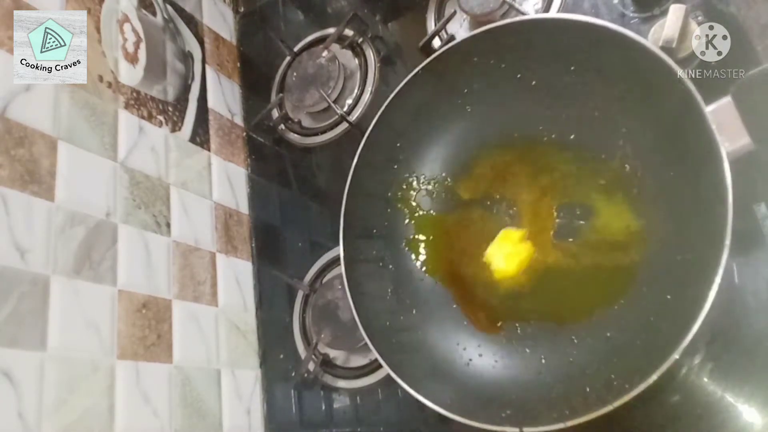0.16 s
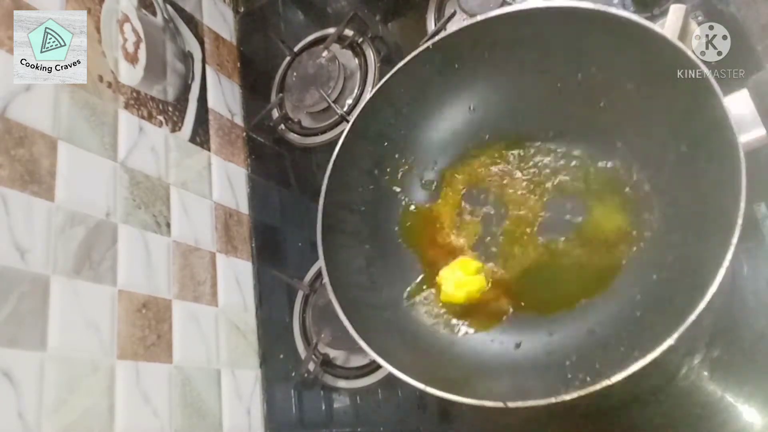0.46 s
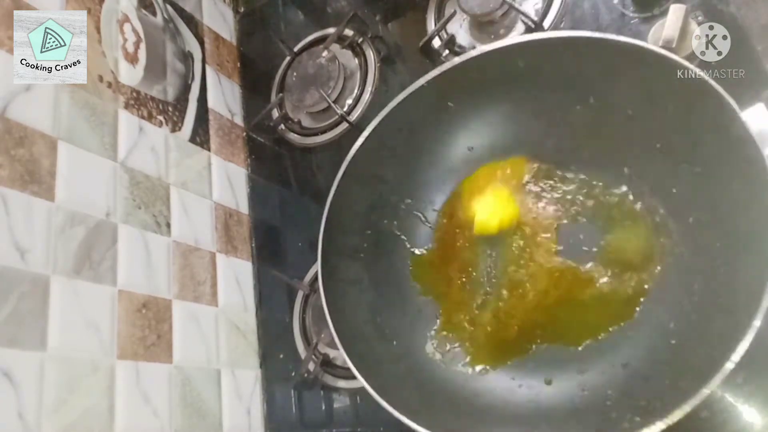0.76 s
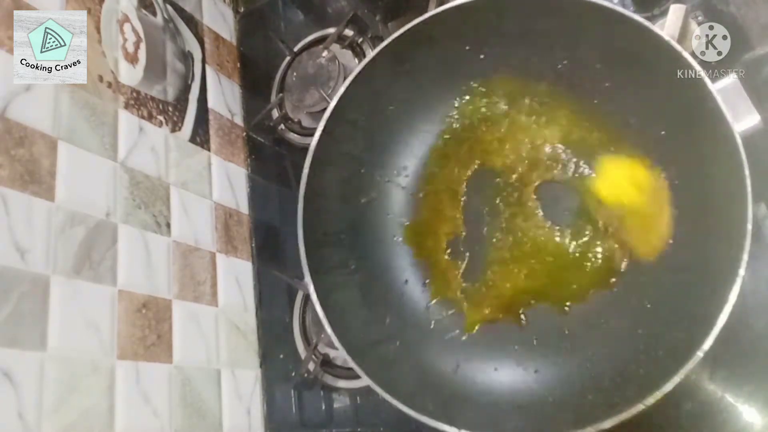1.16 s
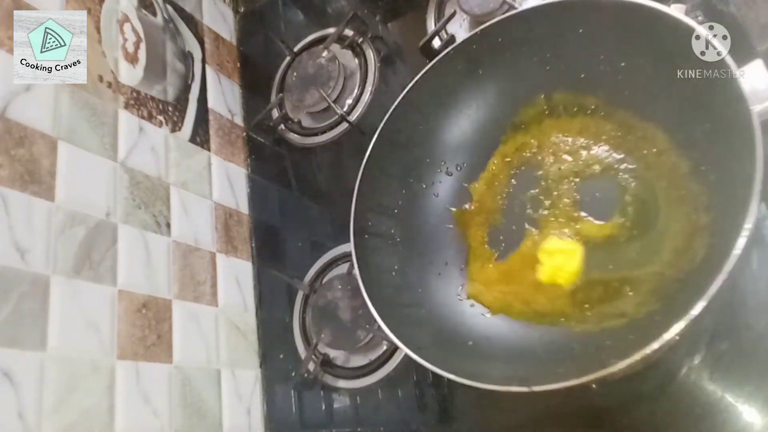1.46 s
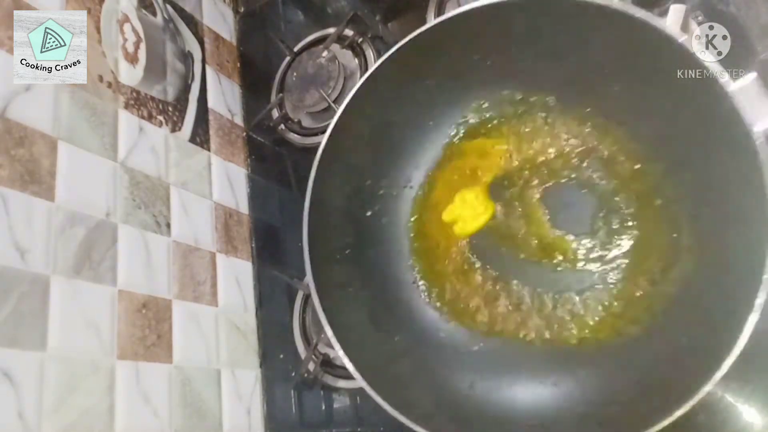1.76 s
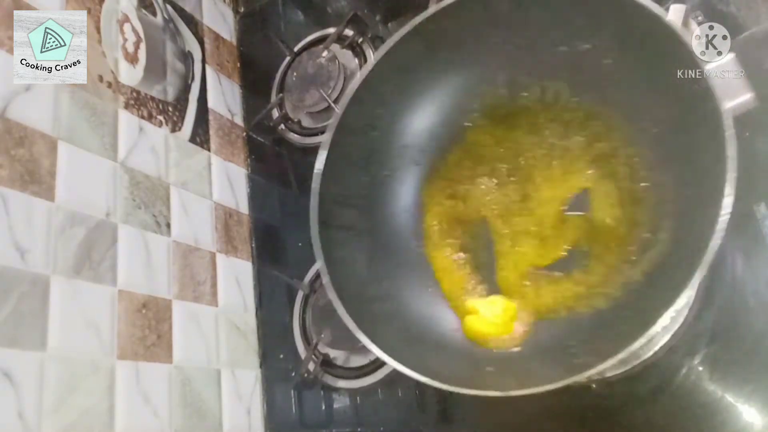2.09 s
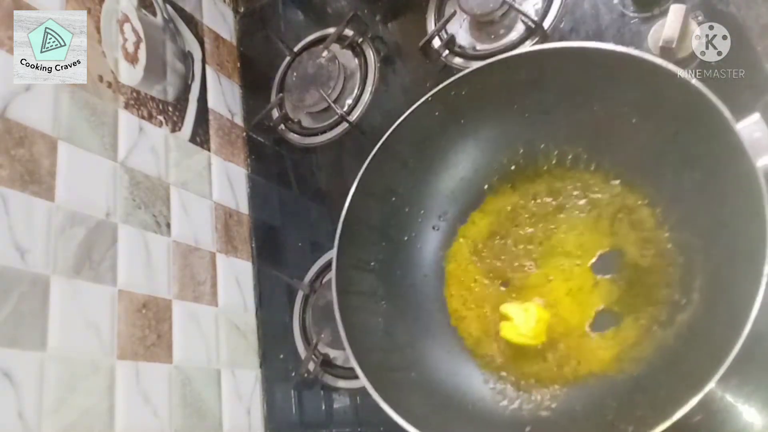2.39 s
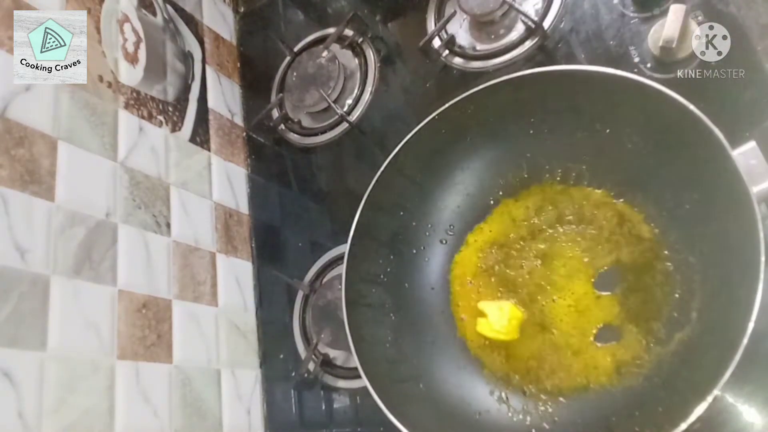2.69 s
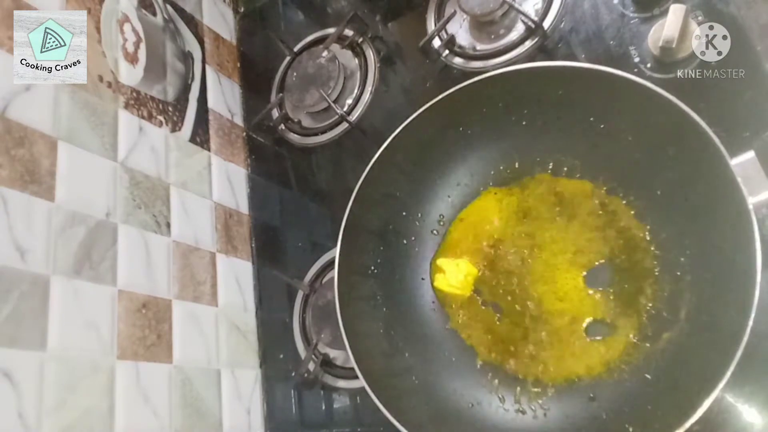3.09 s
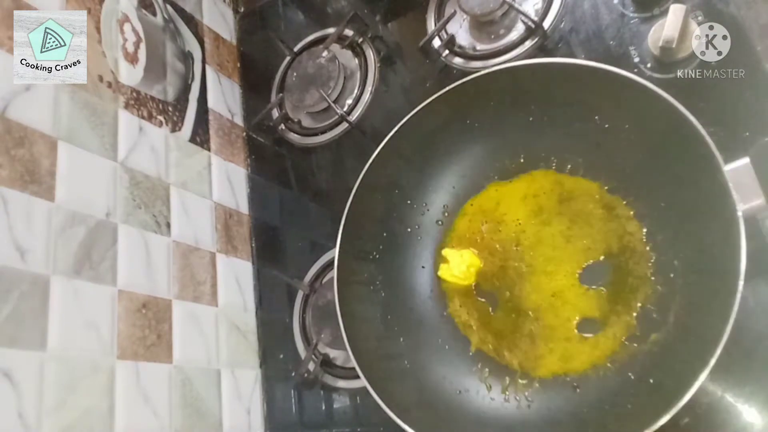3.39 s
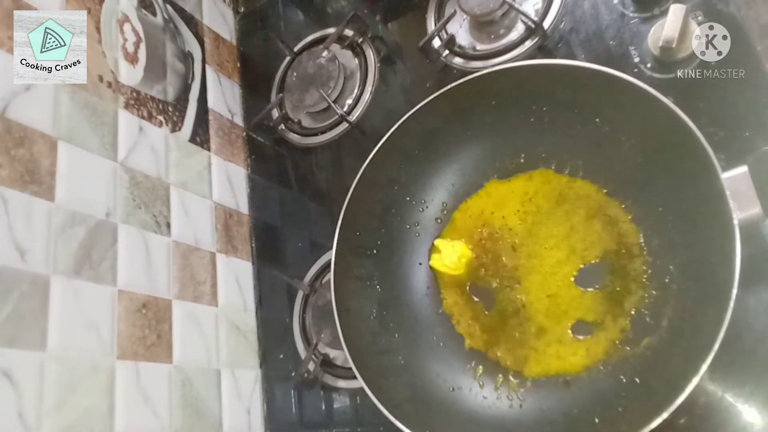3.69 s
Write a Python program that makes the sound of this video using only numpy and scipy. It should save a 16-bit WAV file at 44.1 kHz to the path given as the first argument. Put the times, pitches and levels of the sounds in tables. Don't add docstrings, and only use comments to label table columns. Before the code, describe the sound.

Sizzling butter and oil in a swirled pan, crackling crisply, with a few metallic knocks against the grate.

```python
import sys
import numpy as np
from scipy import signal
from scipy.fft import rfft, irfft, next_fast_len
from scipy.io import wavfile
from scipy.ndimage import uniform_filter1d, map_coordinates

SR = 44100
rng = np.random.default_rng(int(sys.argv[2]) if len(sys.argv) > 2 else 0)


def amplitude_ratio(level_db):
    exponent = np.asarray(level_db, float) / 20
    return 10 ** exponent


def dump(signal):
    limited = np.clip(np.atleast_2d(signal).T, -1, 1)
    pcm = np.round(limited * 32767).astype(np.int16)
    wavfile.write(sys.argv[1], SR, pcm)


N = 169785


def band(x, hz, q):
    return signal.lfilter(*signal.iirpeak(min(hz, 0.45 * SR), max(q, 0.3), fs=SR), x)


def band_twice(x, hz, q):
    return band(band(x, hz, q), hz, q)


def unit(x):
    return x / np.sqrt(np.mean(x ** 2))


def colour(x, points, peaks=()):
    n, points = next_fast_len(N), np.array(points)
    f = np.arange(n // 2 + 1) * SR / n + 1
    db = np.interp(np.log(f), np.log(points[:, 0]), points[:, 1])
    for hz, width, peak_db in peaks:
        db = db + peak_db / (1 + (2 * (f - hz) / width) ** 2)
    return irfft(rfft(x, n) * amplitude_ratio(db), n)[:N]


def walk(rate):
    hold = int(SR / rate)
    steps = np.repeat(rng.standard_normal(N // hold + 1), hold)
    return unit(uniform_filter1d(uniform_filter1d(steps, hold), hold)[:N])


def clicks(rate, spread_db):
    happens = rng.random(N) < rate / SR
    size = np.minimum(rng.exponential(size=N), 4)
    return unit(happens * rng.choice([-1, 1], N) * amplitude_ratio(spread_db * size))


def follow(t, table):
    times, *columns = np.array(table).T
    return [np.interp(t, times, c) for c in columns]


# (frequency [Hz], level [dB])
ROOM_COLOUR = [(25, -7), (60, -5.5), (135, 0.5), (200, -2.5), (300, -8.5), (500, -12.5), (1400, -10),
               (3000, -47)]


def kitchen():
    waver_db = 1.2 * walk(4.54)
    return unit(colour(rng.standard_normal(N), ROOM_COLOUR)) * amplitude_ratio(-82.5 + waver_db)


# (time [s], level [dB], bubble size tilt [dB per octave])
FIZZ_COURSE = [(0, -53.5, 0), (.14, -51.5, 1), (.3, -51.5, 1.5), (.55, -49.5, -0.5), (.77, -49.5, -2),
               (1.0, -48.5, 0.5), (1.1, -48.5, 1.5), (1.24, -53, -0.5), (1.45, -53, -2.5), (1.6, -48, -3),
               (1.72, -46.5, -1.3), (1.9, -46.5, -0.2), (2.03, -48.5, -1), (2.4, -50, -1.5),
               (2.65, -49, -1), (3.0, -51, -1), (3.4, -52, -1), (3.85, -54.5, -1.5)]
# (frequency [Hz], level [dB])
FIZZ_TONE = [(300, -35), (900, -33), (2200, -15), (4000, -12), (5500, -7), (8000, 0.5), (11000, -5.5),
             (15400, -15)]
# (frequency [Hz], width [Hz], level [dB])
BOWL_AND_PORT = [(4600, 600, 1.5), (5250, 630, 2.5), (8680, 320, -5.5), (9570, 1030, 7.5)]


def fizz(t, wall):
    level_db, tilt_db = follow(t, FIZZ_COURSE)
    burst_q, chirp_q = 5.7, 32
    spits, shared, out = clicks(450, 2.5), walk(16), 0
    for hz in 350 * 2 ** (np.arange(34) / 6):
        burst = clicks(260 * hz / 4000, 3.5) + amplitude_ratio(1) * rng.standard_normal(N)
        burst += amplitude_ratio(-10) * spits * (5000 / max(hz, 3000)) ** 0.55
        chirps = amplitude_ratio(-7) * band(clicks(14, 2.0), hz, chirp_q) * np.sqrt(chirp_q / burst_q)
        flicker_db = 2.5 * (1 - 0.5 * amplitude_ratio(wall[1])) * walk(9)
        db = tilt_db * np.log2(hz / 8000) + 0.3 * shared + flicker_db + wall_tint(hz, wall)
        out = out + (band(burst, hz, burst_q) + chirps) * amplitude_ratio(db)
    return unit(colour(out, FIZZ_TONE, BOWL_AND_PORT)) * amplitude_ratio(level_db)


# (frequency [Hz], width [Hz], level [dB])
HUM_MODES = [(1617, 34, -18), (1555, 102, -20), (994, 39, -30.5), (827, 53, -31), (1170, 110, -29)]


def pan_hum(t, wall):
    echo_db, out = wall[1], 0
    for hz, width, db in HUM_MODES:
        push = clicks(700, 4.7) + rng.standard_normal(N)
        shade_db = -8 * amplitude_ratio(echo_db) * (hz < 1300)
        out = out + unit(band(push, hz, hz / width)) * amplitude_ratio(db + shade_db)
    return out * amplitude_ratio(follow(t, FIZZ_COURSE)[0] - 2.5 + 0.65 * walk(11.76))


# (frequency [Hz], level [dB], t60 [s])
PAN_MODES = [(191, -9.5, 0.33), (247, -9, 0.19), (463, -17, 0.21), (564, -19.5, 0.11), (742, -20, 0.33),
             (823.4, -3, 0.088), (950, -3.5, 0.1), (1092, 0.5, 0.023), (1155, -8, 0.11),
             (1270, -14.5, 0.12), (1584, 2.5, 0.051), (1635, -0.5, 0.061), (1655, -5, 0.036),
             (2610, -16.5, 0.027)]
# (time [s], low thud [dB], middle ring [dB], 1 kHz ring [dB], high ring [dB])
KNOCK_TIMES = [(.0, -85, -79, -84, -68), (.052, -41, -36.5, -47.5, -39.5), (0.075, -77, -60, -63, -53),
               (0.087, -57, -62, -64, -58), (1.391, -60, -42.5, -46.5, -40.5),
               (1.404, -56, -48.5, -72, -79), (2.636, -53.5, -49.5, -54.5, -51), (2.69, -68, -68, -66, -72),
               (2.719, -67, -88, -76, -92), (3.0377, -58.5, -56, -38.5, -53), (3.085, -65, -68, -62, -59.5),
               (3.372, -56, -57, -52, -58), (3.389, -58.5, -53.5, -54.5, -53)]
RING_SHARE = [0.91, 1.09, 0.92, 1.06, 0.57, .9, 1.02, 0.8, .9, 0.59, 0.89, 0.48, 0.8]
GROUP_EDGES = [400, 900, 1400, 2200]
GROUP_COLUMN = [0, 1, 2, 3, 1]


def knocks(t):
    out, (rattle_noise, iron_noise, thud_noise) = np.zeros(N), rng.standard_normal((3, N))
    detune = 1 + 0.0035 * rng.standard_normal((len(KNOCK_TIMES), len(PAN_MODES)))
    tick = unit(band(iron_noise, 6660, 4.0))
    clatter = unit(band(band_twice(iron_noise, 1100, 0.66), 1100, 0.66))
    thud = unit(band_twice(thud_noise, 169, 0.76))
    rattles = [unit(band_twice(rattle_noise, hz, hz / 130)) for hz, _, _ in PAN_MODES]
    for (s, *group_db), bend, free in zip(KNOCK_TIMES, detune, RING_SHARE):
        i = slice(int(s * SR), int(s * SR) + SR // 2)
        u = t[i] - t[i.start]

        def fall(t60):
            return amplitude_ratio(-60 * u / t60)

        for k, (hz, db, t60) in enumerate(PAN_MODES):
            swell = (-1) ** k * fall(free * t60) - fall(0.024)
            ring = swell * np.sin(2 * np.pi * hz * bend[k] * u)
            ring += amplitude_ratio(-8.5) * fall(free * min(2.6 * t60, 0.3)) * rattles[k][i]
            mode_db = group_db[GROUP_COLUMN[np.searchsorted(GROUP_EDGES, hz)]] + db
            out[i] += amplitude_ratio(mode_db) * ring * (1 - np.exp(-u * hz / 0.5))
        out[i] += amplitude_ratio(group_db[1] - 5.5) * fall(0.058) * tick[i]
        out[i] += amplitude_ratio(max(group_db[1:]) - 16) * fall(0.3) * clatter[i]
        out[i] += amplitude_ratio(group_db[0] - 6.5) * fall(0.33) * (1 - np.exp(-u / 0.0057)) * thud[i]
    return out


# (time [s], frequency [Hz], level [dB], t60 [s])
BAR_STRIKES = [(0, 733, -72, 0.22), (0.053, 1310, -46, .1), (.052, 1616, -48, 0.33),
               (.052, 2700, -53, 0.066), (1.391, 1220, -42, .06), (1.391, 897, -51, 0.26),
               (1.391, 963, -52, 0.23), (1.41, 189, -55.5, 0.14), (2.65, 1000, -59, .18),
               (3.7, 1622, -57, 0.087), (3.05, 70, -61, .15), (2.66, 70, -62, .2),
               (1.391, 2110, -56.5, .03), (2.715, 189, -58, .15), (3.0381, 1715, -39, 0.039),
               (3.0383, 1200, -45, .035), (3.0377, 827, -47, .08), (3.385, 978, -53, .12)]


def grate_bars(t):
    out = np.zeros(N)
    for s, hz, db, t60 in BAR_STRIKES:
        start = int(s * SR)
        u = t[:min(SR // 3, N - start)]
        ring = np.sin(2 * np.pi * hz * u) * (1 - np.exp(-u * hz / 0.5))
        out[start:start + len(u)] += amplitude_ratio(db - 60 * u / t60) * ring
    return out


# (time [s], peak [dB], pitch [Hz])
DROP_POPS = [(.811, -42, 7300), (.857, -34, 6900), (.887, -36, 9200), (0.922, -37, 9560),
             (1.0055, -34.5, 5800), (1.076, -27, 9180), (.566, -38, 5630), (2.64, -38, 6040),
             (2.787, -43, 9590), (2.885, -37, 9700), (3.014, -39, 8400), (3.099, -35, 5500),
             (3.209, -41, 9500), (3.346, -31, 10000), (3.355, -33.5, 5400), (3.374, -36, 5800),
             (3.432, -39, 5640), (3.533, -37.5, 5860), (3.713, -40.5, 5000), (3.032, -37, 5270),
             (3.845, -43, 5330), (3.268, -43, 8200), (3.595, -40, 8000), (.189, -47, 4600),
             (.204, -43, 5600), (.456, -47, 4100), (1.197, -43, 5600), (1.301, -44, 5600),
             (1.328, -50, 3460), (1.654, -38, 4900), (2.157, -48, 3600), (2.429, -43, 5600),
             (2.594, -47, 3560), (2.746, -38, 6250), (2.806, -41, 6400), (3.083, -43, 5400),
             (3.28, -43, 5400), (1.049, -34, 9400), (.935, -38, 9300), (1.598, -37, 6800),
             (1.622, -35, 9300), (1.7, -35, 9600), (.872, -38, 6800)]


def pops(t):
    out = np.zeros(N)
    for s, db, hz in DROP_POPS:
        start = int(s * SR)
        u = t[:min(SR // 50, N - start)]
        envelope = np.exp(-np.pi * hz * u / 17.5) * (1 - np.exp(-u / 0.00025))
        out[start:start + len(u)] += amplitude_ratio(db) * np.sin(2 * np.pi * hz * u) * envelope
    return out


# (start [s], length [s], level [dB], centre [Hz], sharpness [Q])
DRAGS = [(0.585, 0.04, -74, 199, 2.5), (.68, .35, -80, 110, 1.2), (2.74, .3, -78, 140, 1.5),
         (3.64, .21, -76, 170, 1.5), (.61, .05, -78.5, 380, 2.4), (1.6, .3, -74.5, 170, 2.0),
         (1.68, .08, -70, 820, 1.5), (3.55, 0.13, -76, 180, 2.8), (3.71, 0.076, -74, 1100, 1.5),
         (1.588, 0.12, -66, 420, 0.76), (1.68, 0.065, -62, 430, 1.6), (1.72, 0.12, -66, 290, 0.65),
         (2.38, 0.14, -73, 150, 2.2), (2.46, .2, -76.5, 410, 1.9), (2.53, 0.24, -77, 250, .9),
         (3.18, 0.34, -70, 182, 3.8), (3.53, 0.2, -78, 470, 0.89), (3.71, 0.12, -72, 480, .7),
         (3.37, 0.07, -62.5, 560, 1), (2.635, 0.063, -66, 480, 0.98), (0.9, 0.64, -77, 130, 2.5),
         (2.15, 0.092, -81, 300, 0.9), (1.51, 1.0, -81, 130, 1.3)]


def scrapes(t):
    grit = (clicks(500, 2.5) + 0.6 * rng.standard_normal(N)) * amplitude_ratio(2.2 * walk(45))
    out = 0
    for s, length, db, hz, q in DRAGS:
        u = np.clip((t - s) / length, 0, 1)
        out = out + unit(band_twice(grit, hz, q)) * amplitude_ratio(db) * np.sin(np.pi * u ** 0.6)
    return out


# (time [s], peak [dB])
DRY_SNAPS = [(1.563, -44), (1.657, -42), (2.996, -42), (3.3148, -35.5), (3.303, -41), (3.471, -41),
             (3.565, -43), (1.43, -41), (1.0805, -38), (3.6945, -39), (.805, -43), (2.505, -42),
             (2.061, -40), (2.585, -39), (3.847, -44), (1.308, -45)]


def snaps():
    snap = np.zeros(N)
    for s, db in DRY_SNAPS:
        snap[int(s * SR)] = amplitude_ratio(db + 7)
    out = 0.3 * band_twice(snap, 7500, 1.2) + 2.2 * band_twice(snap, 1650, 5.0)
    return out + 0.5 * band(snap, 3800, 4.0) + 1.5 * band(snap, 5600, 3.0) + band(snap, 9800, 4.0)


# (time [s], first notch [Hz], echo [dB], bowl lift [dB])
WALL_COURSE = [(2.45, 2310, -22, -1), (2.6, 2460, -7.5, 1), (2.75, 2690, -5, -1.5), (2.88, 2810, -5, -0.5),
               (2.97, 2850, -4, 6), (3.15, 3170, -1, 4), (3.3, 3400, 1, 1.5), (3.45, 3550, -4, 4),
               (3.58, 3670, -6, 6), (3.67, 2960, -3.5, 4), (3.76, 2440, -12, -1), (3.85, 2160, -10, -1)]


def pan_wall(t):
    return follow(t, WALL_COURSE)


def wall_tint(hz, wall):
    notch_hz, echo_db, lift_db = wall
    shade = -9 * amplitude_ratio(echo_db) / (1 + (hz / notch_hz / 1.1) ** 6)
    lift = lift_db / (1 + (2 * (hz - 5600) / 1800) ** 4)
    dip = -6.5 * amplitude_ratio(echo_db) / (1 + (2 * (hz - 2.11 * notch_hz) / 800) ** 2)
    return shade + lift + dip


def wall_echo(t, sound, wall):
    notch_hz, echo_db, lift_db = wall
    flat = signal.filtfilt(*signal.butter(4, 6600, fs=SR), sound)
    tilted = signal.filtfilt(*signal.butter(4, 4800, fs=SR), sound)
    dull = flat + np.clip(lift_db / 3, 0, 1) * (tilted - flat)
    delay_s = (1 + 0.02 * walk(16)) / notch_hz
    return -amplitude_ratio(echo_db) * map_coordinates(dull, [(t - delay_s) * SR], mode="mirror")


def scene():
    t = np.arange(N) / SR
    wall = pan_wall(t)
    bubbles = fizz(t, wall)
    pan = pan_hum(t, wall) + knocks(t) + grate_bars(t) + scrapes(t)
    fat = bubbles + wall_echo(t, bubbles, wall) + pops(t) + snaps()
    return (kitchen() + fat + pan)[None]


def roll_off(x):
    return signal.sosfilt(signal.butter(12, 15720, fs=SR, output="sos"), x)


def record(dry):
    mix = signal.lfilter(*signal.butter(1, 86, "high", fs=SR), dry)
    return roll_off(mix)


dry = scene()
out = record(dry)
dump(out)
```